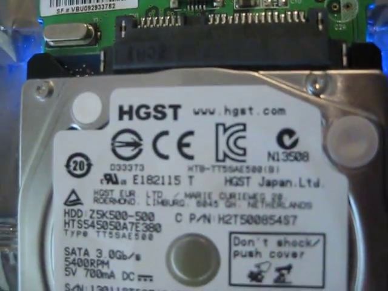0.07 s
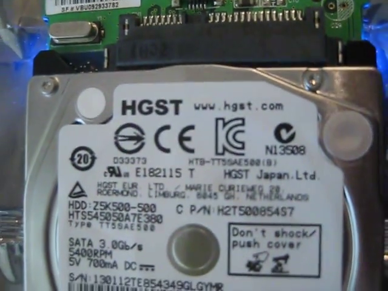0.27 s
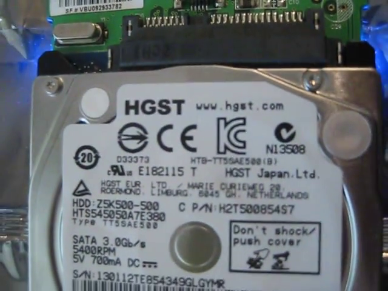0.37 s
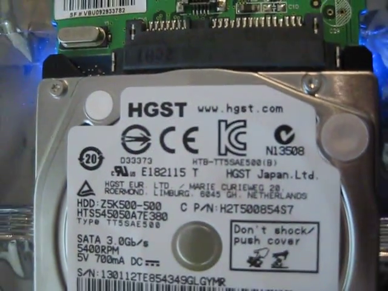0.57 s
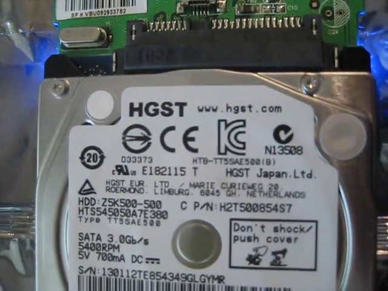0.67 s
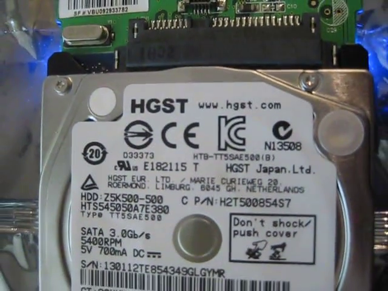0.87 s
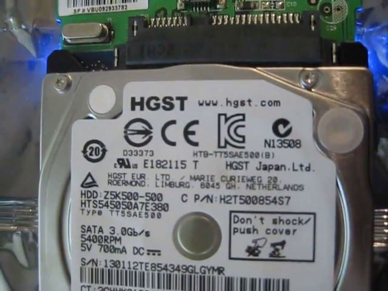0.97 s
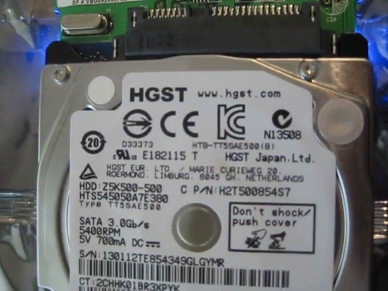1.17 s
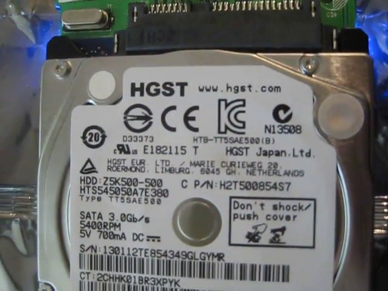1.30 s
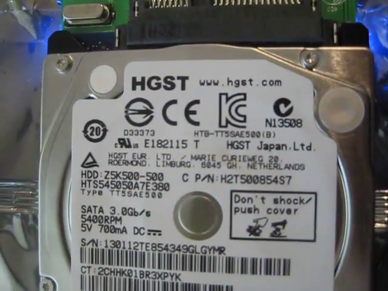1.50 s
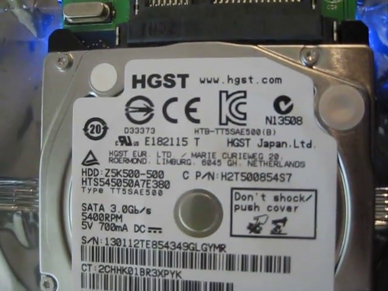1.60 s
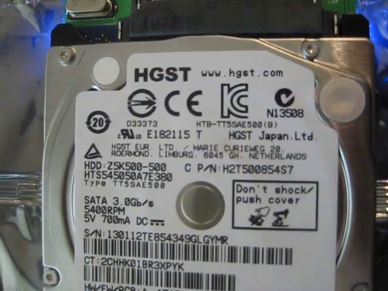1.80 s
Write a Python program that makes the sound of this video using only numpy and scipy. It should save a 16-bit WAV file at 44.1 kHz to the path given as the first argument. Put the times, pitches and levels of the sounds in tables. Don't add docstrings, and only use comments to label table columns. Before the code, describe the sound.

Hard drive head clicks, very close to a small camera microphone in a quiet room. Low fan rumble, light hiss, thin steady whines and a faint buzzy chatter of about 30 bursts a second run throughout. At 0.2 s comes one dry, sharp click with a tiny metallic ring; at about 0.98 s a softer knock with an immediate bright tick. Then only the whirring background continues to about 1.9 s.

```python
import sys
import numpy as np
from scipy import signal
from scipy.io import wavfile
from scipy.ndimage import uniform_filter1d

SR = 44100
rng = np.random.default_rng(int(sys.argv[2]) if len(sys.argv) > 2 else 0)


def generate_wav(signal):
    frames = np.transpose(np.atleast_2d(signal))
    scaled = np.clip(frames, -1, 1) * 32767
    pcm = np.round(scaled).astype(np.int16)
    wavfile.write(sys.argv[1], SR, pcm)


def elevation(decibels):
    levels = np.asarray(decibels, float)
    return 10 ** (levels / 20)


N = 81585

# pitch_hz, density_db (per Hz)
RUMBLE_SPECTRUM = [(20, -28), (60, -4), (300, 0), (800, -4.5), (3100, -10.5), (3600, -17), (5000, -18.5),
                   (6200, -22.5)]
# pitch_hz, density_db (per Hz)
HISS_SPECTRUM = [(5000, -16), (9000, 6.5), (12500, -4), (15600, 4.5)]

# centre_s, high_ring_db, low_ring_db
CHATTER_BURSTS = [(0.02, -56.5, -51), (0.058, -57.5, -52.5), (0.121, -56, -54), (0.153, -60.0, -59),
                  (0.287, -53, -55), (0.317, -51, -58), (0.359, -56, -54), (0.392, -51.5, -65),
                  (0.422, -61, -56), (0.465, -56, -61), (0.491, -52.5, -53), (0.531, -56, -46.5),
                  (0.565, -54, -52), (0.59, -61, -57), (0.644, -56, -45), (0.679, -52.5, -50),
                  (0.703, -55, -43.5), (0.737, -55, -48), (0.815, -55, -45), (0.844, -56, -53),
                  (0.879, -53, -48.5), (0.905, -55, -54), (0.933, -68, -66.0),
                  (1.014, -55, -51.5), (1.062, -51, -52), (1.11, -66.0, -63), (1.145, -57, -51),
                (1.169, -51.5, -62), (1.21, -55, -50.5), (1.244, -53.5, -51), (1.31, -53.5, -52),
                (1.362, -55, -58), (1.392, -58, -54), (1.454, -51.5, -45), (1.49, -53, -52),
                (1.521, -57, -47.5), (1.557, -54.5, -52.0), (1.58, -73, -66), (1.616, -55, -54),
                (1.655, -54, -50), (1.688, -51, -49.5), (1.723, -56, -57.0), (1.751, -60, -73),
                (1.787, -54.5, -49), (1.842, -52, -48),
                  (0.106, -59, -67), (0.188, -62, -51), (.245, -61, -60), (.272, -62, -61), (.628, -60, -61),
                (.797, -59, -67), (.992, -61, -51), (1.033, -60, -50), (1.09, -61, -56), (1.345, -56, -56),
                (1.82, -53, -57)]
# pitch_hz, width_hz, level_db
HIGH_RINGS = [(5340, 200, -9), (5540, 170, -2)]
# pitch_hz, width_hz, level_db
LOW_RINGS = [(2000, 83, -0.1), (2290, 220, -8.5)]
# pitch_hz, width_hz, level_db
SIDE_RINGS = [(2960, 490, -61), (4130, 160, -70.5)]

# pitch_hz, level_db (rms)
WHINES = [(1535.5, -68), (1669, -74), (2160, -72), (6480, -78), (8099, -81), (9719.4, -80), (10440, -86),
          (11879.3, -84), (12959.2, -71), (14039, -89), (15734.3, -82)]

# pitch_hz, level_db, t60_s, side
STOP_MODES = [(810, -28, 0.0032, -1), (1480, -29.5, .018, 1), (2475, -14, .005, 1), (3056, -15.5, .04, -1),
              (3555, -4, 0.011, -1), (3870, -4.5, 0.0034, 1), (5000, -15.5, 0.0074, 1),
              (6600, -26.5, .008, -1), (7320, -22.5, 0.0038, -1)]
# pitch_hz, level_db, t60_s, side
CRACK_MODES = [(8600, -36, .005, -1), (9570, -38, .007, -1), (10600, -41, 0.008, -1), (11300, -48, .004, 1),
               (12850, -45, .007, -1), (14300, -39, .006, 1), (15400, -41, .004, -1)]
# pitch_hz, level_db, t60_s, side
LATE_RING_MODES = [(2880, -27, .012, -1), (3470, -36, 0.03, 1)]
# pitch_hz, level_db, t60_s, side
RETURN_MODES = [(440, -26, 0.0088, -1), (820, -36, .008, 1), (1275, -21, 0.012, 1), (2100, -45, 0.026, -1),
                (3100, -16.5, 0.0041, -1), (3650, -33, 0.037, 1), (4420, -12.5, 0.0033, -1),
                (5100, -26, 0.012, -1), (6560, -18, 0.0032, 1)]
# pitch_hz, level_db, t60_s, side
TICK_MODES = [(9200, -37.5, 0.017, 1), (10000, -38, 0.011, -1), (10500, -34, 0.0054, -1),
              (11400, -42, .005, 1), (14000, -39, .008, 1), (5500, -35, 0.015, 1), (8500, -46, .02, 1),
              (15000, -45, .005, 1), (16000, -52, .004, 1)]


def read(points, hz):
    f, value = np.transpose(points)
    return np.interp(np.log(hz + 1), np.log(f + 1), value)


def evened(x):
    return x / np.sqrt(np.mean(x ** 2) + 1e-20)


def air(spectrum, level_db, patch_db, swell_db):
    frames = N // 256 + 5
    hz = np.fft.rfftfreq(1024, 1 / SR)
    real, imaginary, patches = rng.standard_normal((frames, 513, 3)).T
    patches = uniform_filter1d(patches, size=10, axis=0)
    patches = evened(uniform_filter1d(patches, size=10, axis=1))
    swell = evened(uniform_filter1d(rng.standard_normal(frames), size=12))
    level = read(spectrum, hz)[:, None] + patch_db * patches + swell_db * swell
    spectra = (real + 1j * imaginary) * elevation(level)
    noise = signal.istft(spectra, nperseg=1024, noverlap=768)[1][:N]
    return elevation(level_db) * evened(noise)


def room_rumble():
    return air([*RUMBLE_SPECTRUM, (16000, -33)], level_db=-46, patch_db=0.49, swell_db=0.5)


def preamp_hiss():
    return air([(1000, -42), *HISS_SPECTRUM], level_db=-62, patch_db=0.69, swell_db=0.26)


def resonate(x, hz, width_hz):
    turn = np.exp(2j * np.pi * hz * np.arange(len(x)) / SR)
    r = np.exp(-np.pi * width_hz / SR)
    return (turn * signal.lfilter([1], [1, -2 * r, r * r], x / turn)).real


def rung_case(taps, burst, hz, width_hz, db):
    even_s = 0.014
    x = evened(resonate(taps, hz, width_hz))
    power = abs(uniform_filter1d(x ** 2, size=int(even_s * SR)))
    return elevation(db) * burst * x / np.sqrt(power + 0.12)


def chatter():
    burst_s, taps_per_s, tap_spread_db = 0.0055, 4500, 2.0
    low_shorter = 0.81
    high_rest_db, low_rest_db = -70.5, -66
    centre_s, high_db, low_db = np.transpose(CHATTER_BURSTS)
    shape = np.exp(-0.5 * ((np.arange(N)[:, None] / SR - centre_s) / burst_s) ** 2)

    taps = rng.standard_normal(N) * (rng.random(N) < taps_per_s / SR)
    taps = taps * elevation(tap_spread_db * np.minimum(rng.exponential(1, N), 4))

    high = elevation(high_rest_db) + shape @ elevation(high_db)
    low = elevation(low_rest_db) + shape ** (1 / low_shorter ** 2) @ elevation(low_db)
    both = evened(evened(high) + evened(low))
    total = np.zeros(N)
    for burst, rings in [(high, HIGH_RINGS), (low, LOW_RINGS), (both, SIDE_RINGS)]:
        for hz, width_hz, db in rings:
            total += rung_case(taps, burst, hz, width_hz, db)
    return total


def whines():
    t = np.arange(N) / SR
    total = np.zeros(N)
    for hz, db in WHINES:
        total += np.sqrt(2) * elevation(db) * np.sin(2 * np.pi * (hz * t + rng.random()))
    return total


def ring(start_s, rise_s, damp_s, modes):
    t = np.clip(np.arange(N) / SR - start_s, 0, 0.2)
    swing = np.zeros(N)
    for hz, db, t60_s, side in modes:
        swing += np.sign(side) * elevation(db - 60 * t / t60_s) * np.sin(2 * np.pi * hz * t)
    return (1 - np.exp(-t / rise_s)) * np.exp(-(t / damp_s) ** 2) * swing


def arm_stop():
    stop_s = 0.209675
    click = ring(stop_s, rise_s=0.00002, damp_s=0.0026, modes=[*STOP_MODES, *CRACK_MODES])
    late_ring = ring(stop_s, rise_s=0.002, damp_s=0.05, modes=LATE_RING_MODES)
    return click + late_ring


def arm_return():
    knock = ring(0.97814, rise_s=0.0009, damp_s=0.0047, modes=RETURN_MODES)
    tick = ring(0.9788, rise_s=0.00049, damp_s=0.0022, modes=TICK_MODES)
    return knock + tick


def scene():
    steady = room_rumble() + preamp_hiss() + chatter() + whines()
    edge = signal.firwin(1023, 15760, window=("kaiser", 7), fs=SR)
    steady = signal.oaconvolve(steady, edge, "same")
    return (steady + arm_stop() + arm_return())[None]


def band_limit(x):
    return signal.sosfilt(signal.butter(12, 16820, fs=SR, output="sos"), x)


def record(dry):
    notch_hz, width_hz = 7875, 1730
    b, a = signal.iirnotch(notch_hz, notch_hz / width_hz, SR)
    mix = signal.lfilter(b, a, dry)
    return band_limit(mix)


dry = scene()
out = record(dry)
generate_wav(out)
```